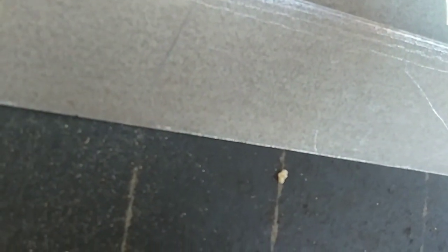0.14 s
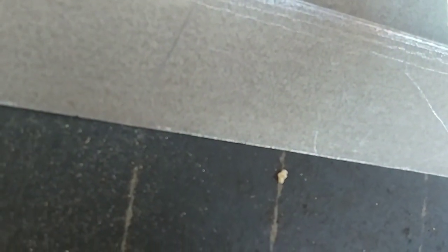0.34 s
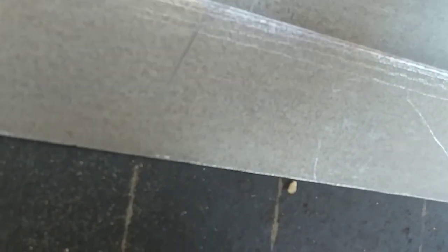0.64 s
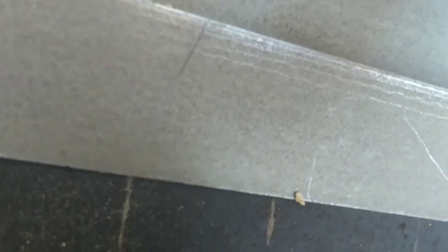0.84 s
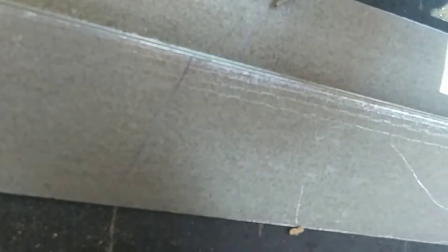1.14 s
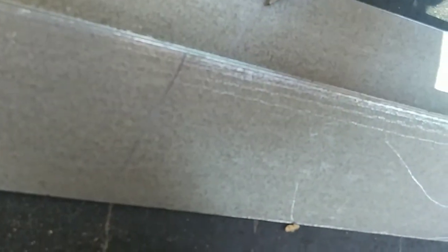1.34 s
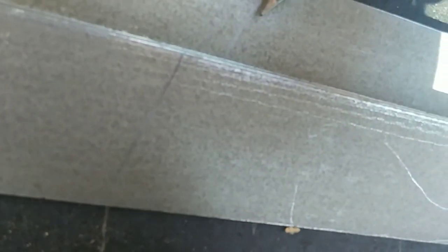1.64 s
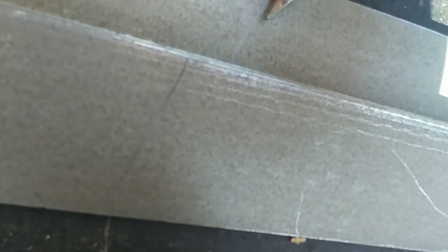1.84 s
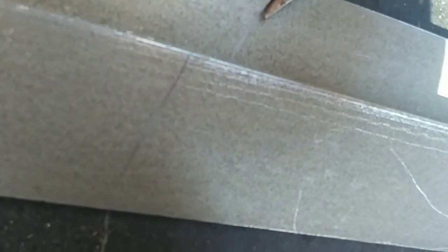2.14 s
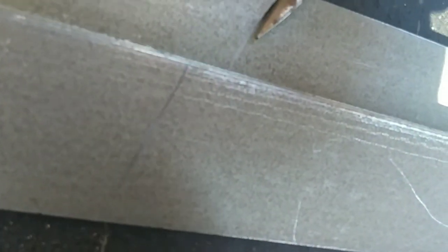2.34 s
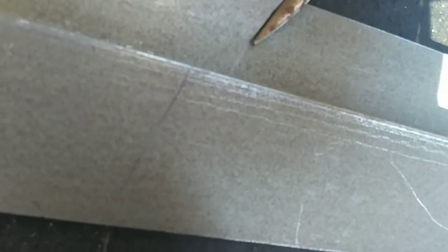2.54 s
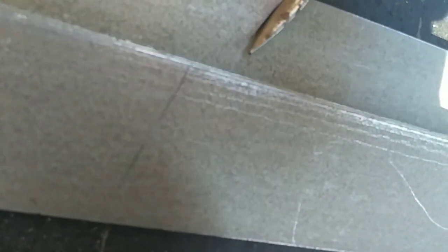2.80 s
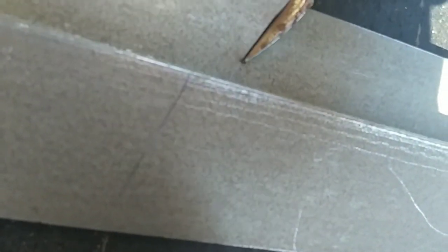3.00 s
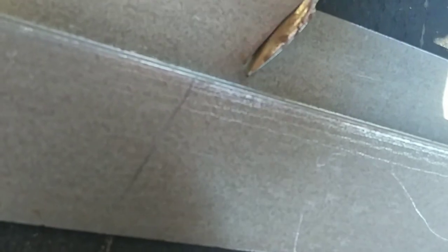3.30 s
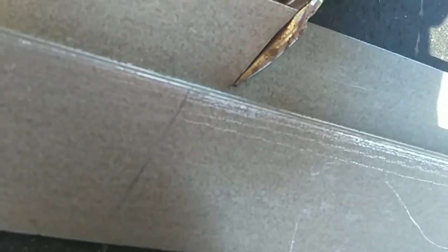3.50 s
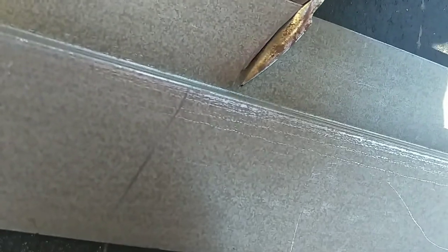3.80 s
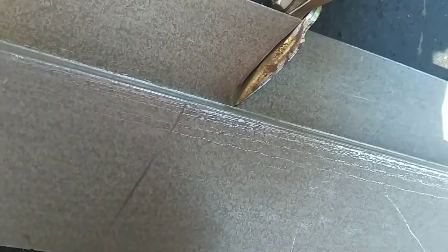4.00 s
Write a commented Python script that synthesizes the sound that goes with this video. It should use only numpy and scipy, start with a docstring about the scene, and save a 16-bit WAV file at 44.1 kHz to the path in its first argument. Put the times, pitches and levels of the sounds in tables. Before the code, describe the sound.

Close, dry metallic scrapes and ticks of metal snips on roof flashing, one low buckling wobble, and two crunching cuts that ring.

```python
"""Hand snips scrape through sheet-metal flashing on a roof, close to the microphone: random slips ring the sheet.
Twice the jaws bite through with a crack and a short crunch of jerky noise that leaves the sheet ringing.
Edges catch with clicks and damped rings, the blade squeaks in thin gliding tones, and once the sheet
buckles with a low wobble that sinks in pitch. Faint outdoor noise, flickering band by band, lies behind."""
import sys
import numpy as np
from scipy import signal
from scipy.fft import rfft, irfft
from scipy.io import wavfile
from scipy.ndimage import uniform_filter1d

SR = 44100
rng = np.random.default_rng(int(sys.argv[2]) if len(sys.argv) > 2 else 0)


def generate_wav(sig):
    """Save sig (samples, or channels by samples) to the path in sys.argv[1] as 16-bit PCM at SR."""
    pcm = np.round(np.clip(np.atleast_2d(sig).T, -1, 1) * 32767).astype(np.int16)
    wavfile.write(sys.argv[1], SR, pcm)


N = 183073
T = np.arange(N) / SR
RING_T = T[:SR]  # one second, enough for any ring or push
RELEASE_DB_PER_S = 150.5  # how fast the sound dies once the hand lets go

# colour of the flashing's crowd of weak modes: pitch_hz [Hz], level_db [dB]
SHEET_COLOUR = [(150, -45), (380, -22.5), (570, -16.5), (950, -2), (1500, -5), (2100, -7.5), (2550, 3),
                (2950, -9.5), (3350, 1.5), (3750, -12), (4350, -11.5), (5600, -17), (6900, -10),
                (7400, -9.5), (7900, -7.5), (8700, -11), (11500, -23)]
# colour of the sheet's low bending: pitch_hz [Hz], level_db [dB]
BEND_COLOUR = [(40, -32), (70, -32), (130, -14), (210, -2.5), (380, 6), (480, 0), (590, -19.5), (820, -6),
               (1150, -30.5), (3000, -41.5)]


def undb(db):
    """Decibels to gain."""
    return 10 ** (np.asarray(db) / 20)


def unit(x):
    """Scale to rms 1."""
    return x / np.sqrt(np.mean(x ** 2))


def unit_energy(x):
    """Scale a response so that it keeps the level of white noise."""
    return x / np.sqrt(np.sum(x ** 2))


def at_hz(points, hz):
    """Read (Hz, value) points on a log-frequency axis."""
    f, value = np.transpose(points)
    return np.interp(np.log(np.maximum(hz, 1)), np.log(f), value)


def colour(x, points):
    """Causal minimum-phase filter with the given (Hz, dB) outline."""
    size = 2048
    outline = undb(at_hz(points, np.fft.rfftfreq(size, 1 / SR)))
    cepstrum = irfft(np.log(outline))
    # folding the cepstrum forward puts the energy as early as possible
    cepstrum[1:size // 2] *= 2
    cepstrum[size // 2 + 1:] = 0
    response = irfft(np.exp(rfft(cepstrum)))
    return signal.fftconvolve(x, response)[:len(x)]


def band(x, lo_hz, hi_hz, order=2):
    """Butterworth band-pass."""
    return signal.sosfilt(signal.butter(order, [lo_hz, hi_hz], "band", fs=SR, output="sos"), x)


def walk(rate_hz):
    """Smooth random drift of rms 1, from random steps taken rate_hz times a second."""
    k = int(SR / rate_hz)
    steps = np.repeat(rng.standard_normal(N // k + 1), k)
    return unit(uniform_filter1d(uniform_filter1d(steps, k), k)[:N])


def add(out, start_s, x):
    """Mix x into out from start_s."""
    i = int(start_s * SR)
    out[i:i + len(x)] += x[:len(out) - i]


def fade(t60_s):
    """Exponential decay by 60 dB in t60_s."""
    return np.exp(-np.log(1000) * RING_T / t60_s)


def slips(rate_hz, spread_db):
    """Stick-slip: tiny impulses at random moments, a few much larger than the rest."""
    size = undb(spread_db * np.minimum(rng.exponential(size=N), np.pi))
    happens = rng.random(N) < rate_hz / SR
    return unit(happens * rng.choice([-1, 1], N) * size)


def sheet_response(modes_db):
    """Ring of the flashing: a dense crowd of weak modes, and strong ones modes_db relative to it."""
    # strongest modes of sheet and blades, before grip damping: pitch_hz [Hz], level_db [dB], t60_s [s]
    strong_modes = [(910, 10, 0.27), (1010, -9, 1.0), (1150, 8, 0.6), (1717, 11.5, 0.34), (2530, -5, 0.41),
                    (2660, 9, 0.28), (2540, 6, 0.15), (2750, -7, 0.42), (2800, 3, .36), (3358, 9, 0.49),
                    (3275, -2, 0.3), (3500, -10, 0.49), (4240, -14, 0.23), (4400, 3.5, .3),
                    (7100, -8, 0.067), (7800, 11.5, 0.28), (8010, 13, 0.13)]
    # decay of the crowd, before grip damping: pitch_hz [Hz], t60_s [s]
    crowd_t60 = [(200, 0.088), (600, 0.47), (1100, 1), (1900, 0.43), (4000, 0.44), (8000, 0.36),
                 (15000, 0.17)]
    crowd, strong = np.zeros(SR), np.zeros(SR)
    edges = np.geomspace(100, 17000, 16)
    for lo, hi in zip(edges, edges[1:]):
        noise = band(rng.standard_normal(SR), lo, hi, order=3)
        crowd += noise * fade(at_hz(crowd_t60, np.sqrt(lo * hi)))
    for hz, db, t60_s in strong_modes:
        strong += undb(db) * fade(t60_s) * np.sin(2 * np.pi * (hz * RING_T + rng.random()))
    return unit_energy(unit_energy(colour(crowd, SHEET_COLOUR)) + undb(modes_db) * unit_energy(strong))


def push(rise_s, hold_s):
    """Pressure of one stroke: it builds, eases while held and is let go."""
    sag_db_per_s = 4.5
    held = np.maximum(RING_T - rise_s, 0)
    sag_db = sag_db_per_s * np.minimum(held, hold_s)
    release_db = RELEASE_DB_PER_S * np.maximum(held - hold_s, 0)
    return np.minimum(RING_T / rise_s, 1) * undb(-(sag_db + release_db))


def scraping(held_t60_s=0.18, direct_db=-3, low_trim_db=-1, hollow_hz=860, count=6):
    """Slips at the blade drive the sheet, which the jaws and hand damp; the same slips bend it at low pitch."""
    # pushes of the blade along the sheet: start_s [s], rise_s [s], hold_s [s], level_db [dB],
    # then relative to level_db: low_db [dB, rumble before low_trim_db], hollow_db [dB, ring], hiss_db [dB, edge]
    strokes = [(0.0, 0.0072, 0.13, -67, 5, -3, -24), (0.13, 0.052, .005, -64, 0, 4, -7),
               (0.487, .005, .003, -49.5, -3, 0, -6.5), (0.505, .05, 0.099, -42.5, -1, -3.5, -5.5),
               (0.753, 0.013, 0.089, -46.5, -2.5, 0, -4.5), (0.85, 0.0084, 0.054, -43, 0.5, -0.5, -6.5),
               (0.885, 0.056, 0.12, -38, -4.5, 0.5, -4), (1.185, 0.013, 0.027, -51.5, -11, -21, -6),
               (1.469, 0.019, 0.049, -49, 3.5, -4, -8), (1.66, 0.005, 0.19, -61, 5.5, -6, 1),
               (1.907, .02, .012, -43, -1.5, -6, -2), (1.98, 0.046, 0.019, -50, -2.5, 1, -11),
               (2.214, 0.022, 0.047, -45, -1, -0.5, -8), (2.3, 0.038, 0.27, -49.5, -11, -10, -2.5),
               (2.361, 0.0046, 0.0082, -46, 0, -5.5, -1.5), (2.716, 0.015, 0.034, -41, 0.5, -6, -9),
               (2.954, .011, .012, -42.5, 1, -2, -7.5), (3.02, 0.0095, 0.0091, -50, 1, -10, -2.5),
               (3.148, 0.0026, 0.033, -46.5, -0.5, -7, -4), (3.22, 0.032, 0.017, -44.5, 3, -4, -9),
               (3.32, 0.035, 0.15, -61, 1, 1, -4), (3.555, 0.014, 0.0069, -40, 1, -2, -6.5),
               (3.73, 0.006, 0.05, -55, -1.5, -2, -7), (3.883, 0.0085, 0.051, -44, -0.5, -1, -6.5),
               (4.11, 0.0044, 0.016, -56, -17, -8, -7)]
    # colour of the rubbing: pitch_hz [Hz], level_db [dB]
    rub_colour = [(400, -5.5), (650, 6.5), (900, 7.5), (1300, 3), (1750, 4), (2550, 1), (3300, -1),
                  (4300, 1), (5500, -1.5), (7800, -2), (9000, -2.5), (12000, -7.5), (15500, -3.5)]
    out, places = np.zeros(N), []
    # each place where the blade touches the sheet has its own slips and ring
    for _ in range(count):
        grains = unit(slips(rate_hz=2000, spread_db=4.0)[:SR])
        response = sheet_response(modes_db=-10) * fade(held_t60_s)
        ring = signal.fftconvolve(grains, response)[:SR]
        direct = undb(direct_db) * unit(colour(grains, SHEET_COLOUR))
        rub = colour(unit(ring) + direct, rub_colour)
        body = signal.sosfilt(signal.butter(4, 5500, fs=SR, output="sos"), rub)
        body = body / np.std(band(body, 1700, 5000))  # the stroke level is that of the middle band
        bend = unit(colour(grains, BEND_COLOUR))
        hollow = unit(band(grains, hollow_hz / 1.14, hollow_hz * 1.133))
        hiss = unit(band(rub, 5240, 21050, order=4))
        places.append(np.array([body, bend, hollow, hiss]))
    for k, (start_s, rise_s, hold_s, level_db, low_db, hollow_db, hiss_db) in enumerate(strokes):
        layers = np.roll(places[k % count], rng.integers(SR), axis=1)  # start anywhere in the texture
        gains = undb(level_db + np.array([0, low_db + low_trim_db, hollow_db, hiss_db]))
        add(out, start_s, gains @ layers * push(rise_s, hold_s))
    return out


def crack(hz, length_s, grit):
    """A sudden release: a few heavily damped cycles with some grit, peak 1."""
    t = RING_T[:SR // 40]
    force = t / length_s * np.exp(-2 * t / length_s)
    noise = unit(band(rng.standard_normal(len(t)), hz / 2.36, hz * 1.69, order=3))
    pulse = force * (np.sin(2 * np.pi * hz * t) + grit * noise)
    return pulse / np.abs(pulse).max()


def struck(response):
    """Scale a ring to rms 1 over its first 10 ms."""
    return response / np.std(response[:SR // 100])


def bites(thump_t60_s=0.52, direct_db=-3, uneven_db=3, blade_hz=4350, blade_db=-8, blade_t60_s=0.17):
    """The metal cracks, the sheet thumps and rings, and the blades crunch on through the cut."""
    # jaws biting through: start_s [s], crack_db [dB peak], crack_hz [Hz], crack_s [s], ring_db [dB],
    # grip_t60_s [s, added damping], thump_db [dB], crunch_db [dB], delay_s [s], spread_s [s]
    bite_rows = [(2.4831, -5.5, 2490, 0.00074, -23, 9.8, -47, -24, 0.022, 0.023),
                 (3.4692, -11, 1137, 0.0024, -24.5, 0.73, -34.5, -34, 0.045, 0.026)]
    out = np.zeros(N)
    for (start_s, crack_db, crack_hz, crack_s, ring_db,
         grip_t60_s, thump_db, crunch_db, delay_s, spread_s) in bite_rows:
        ring = sheet_response(modes_db=-9) * fade(grip_t60_s)
        thump = unit(colour(rng.standard_normal(SR), BEND_COLOUR)) * fade(thump_t60_s)
        add(out, start_s, undb(crack_db) * crack(crack_hz, crack_s, grit=0.33))
        add(out, start_s, undb(ring_db) * struck(ring))
        add(out, start_s, undb(thump_db) * thump)
        # the shearing swells just after the crack, advances in jerks and dies as the jaws close
        swell = np.exp(-.5 * ((T - start_s - delay_s) / spread_s) ** 2) * (T > start_s)
        shear = undb(crunch_db) * swell
        grains = band(slips(rate_hz=4000, spread_db=5.5), 1800, 12400, order=1)
        grains = unit(grains * undb(uneven_db * walk(300)))
        blade_ring = unit_energy(band(ring * fade(blade_t60_s), blade_hz / 1.05, blade_hz * 1.05))
        response = unit_energy(unit_energy(ring) + undb(blade_db) * blade_ring)
        out += signal.fftconvolve(shear * grains, response)[:N]
        out += undb(direct_db) * shear * unit(colour(grains, SHEET_COLOUR))
    return out


def faint_ticks(count=14, mean_db=-43, spread_db=1, centre_hz=4200, octaves=.8, ring_db=-22):
    """Small catches at random moments: start_s, level_db before the trim in ticks(), pitch_hz, ring_db."""
    rows = []
    for _ in range(count):
        start_s = rng.uniform(0, T[-1])
        level_db = mean_db + spread_db * rng.standard_normal()
        pitch_hz = centre_hz * 2 ** (octaves * rng.uniform(-0.96, 1))
        rows.append((start_s, level_db, pitch_hz, ring_db))
    return rows


def ticks(sheet, held_t60_s=0.38, length_s=0.0012, trim_db=-1):
    """Each catch of an edge clicks and rings the damped sheet around its own pitch."""
    # catches at set moments, loud and soft:
    # start_s [s], level_db [dB peak before trim_db], pitch_hz [Hz], ring_db [dB re level_db]
    set_ticks = [(.184, -36.5, 760, -18), (.382, -45, 1400, -11), (0.461, -47.5, 2720, -10),
                 (.551, -29, 835, -16), (1.0202, -25.5, 3340, -10), (1.036, -22, 3200, -15),
                 (1.4122, -46, 5740, -27), (1.4711, -37, 1710, -23), (1.7364, -43.5, 6040, -12),
                 (1.8497, -38.5, 5600, -11), (1.8716, -39.5, 4900, -6), (2.0415, -30, 5310, -17),
                 (2.3663, -23.5, 824, -18), (2.3674, -28, 2860, -7.5), (2.7178, -29, 1800, -18),
                 (2.878, -37.5, 5760, -14.5), (2.9629, -33, 1750, -13), (3.0343, -35.5, 7100, -7.5),
                 (3.1495, -36.5, 3380, -16), (3.169, -30.5, 1130, -13), (3.4105, -35, 1200, -20),
                 (3.461, -29, 1770, 1), (3.4962, -17.5, 4200, -13), (3.5625, -27.5, 615, -24),
                 (3.8341, -34, 3060, -10.5), (3.8855, -34, 3000, -14), (3.911, -26.5, 2270, -27),
                 (3.9115, -23.5, 400, -11.5), (4.113, -35, 2660, -17)]
    out = np.zeros(N)
    damped = sheet * fade(held_t60_s)
    for start_s, level_db, pitch_hz, ring_db in list(set_ticks) + faint_ticks():
        click = crack(pitch_hz, length_s + 1 / pitch_hz, grit=1)  # low catches last longer
        ring = struck(band(damped, pitch_hz / 2, pitch_hz * 2, order=1))
        add(out, start_s, undb(level_db + trim_db) * click)
        add(out, start_s, undb(level_db + ring_db + trim_db) * ring)
    return out


def squeaks(jitter_depth=.05, flutter_db=3):
    """Fast regular stick-slip along the cut: a thin, unsteady tone that glides in pitch."""
    # squeaks: start_s [s], length_s [s], start_hz [Hz], end_hz [Hz], level_db [dB, rms at mid-squeak before flutter]
    squeak_rows = [(1.654, 0.1, 6900, 8800, -60), (2.146, 0.04, 3120, 2880, -63),
                   (2.876, 0.092, 2920, 2820, -59.5), (3.428, 0.039, 2880, 3040, -55)]
    out = np.zeros(N)
    jitter = 1 + jitter_depth * walk(1200)
    flutter = unit(undb(flutter_db * walk(360)))
    for start_s, length_s, start_hz, end_hz, level_db in squeak_rows:
        progress = np.clip((T - start_s) / length_s, 0, 1)
        hz = (start_hz + (end_hz - start_hz) * progress) * jitter
        tone = np.sqrt(2) * np.sin(2 * np.pi * np.cumsum(hz) / SR)
        out += undb(level_db) * np.sin(np.pi * progress) * tone
    return out * flutter


def buckling(flap_hz=48, depth=0.8, unsteady=.09, loosen_s=.04, length_s=.12, judder_db=-7):
    """A bending mode sinks in pitch as the sheet gives way, then flutters and judders as the sheet flaps."""
    start_s, rise_s, level_db, decay_db_per_s = 1.835, 0.0048, -34.5, 102
    start_hz, end_hz, sink_s = 415, 325, .024
    t = np.maximum(T - start_s, 0)
    given = np.maximum(t - rise_s, 0)
    pitch = end_hz + (start_hz - end_hz) * np.exp(-t / sink_s)
    pitch = pitch * (1 + unsteady * walk(200))
    flap = np.sin(2 * np.pi * np.cumsum(flap_hz * (1 + 0.32 * walk(60))) / SR)
    loose = np.minimum(given / loosen_s, 1)  # the flapping builds up once the sheet has given way
    tone = np.sqrt(2) * (1 + depth * loose * flap) * np.sin(2 * np.pi * np.cumsum(pitch) / SR)
    judder = undb(judder_db) * loose * unit(colour(rng.standard_normal(N), BEND_COLOUR))
    db = level_db - decay_db_per_s * given - RELEASE_DB_PER_S * np.maximum(t - length_s, 0)
    return np.minimum(t / rise_s, 1) * undb(db) * (tone + judder)


def outdoors(level_db=-53, flicker_db=2.5):
    """Faint outdoor noise: coloured noise whose level flickers separately in each band."""
    # colour of the outdoor air: pitch_hz [Hz], level_db [dB]
    air_colour = [(25, -71), (55, -18), (110, -1), (200, 5.5), (350, 1), (600, 0.5), (950, 0.5),
                  (1500, -3.5), (2100, -17.5), (4000, -20.5), (8000, -24), (12000, -35), (16000, -53)]
    noise = unit(colour(rng.standard_normal(N), air_colour))
    spectrum, hz = rfft(noise), np.fft.rfftfreq(N, 1 / SR)
    edges = [0, 250, 600, 1200, 2500, 6000, SR]
    out = np.zeros(N)
    for lo, hi in zip(edges, edges[1:]):
        part = irfft(spectrum * ((hz >= lo) & (hz < hi)), N)
        out += part * undb(level_db + flicker_db * walk(23.95))
    return out


def scene():
    """The snips at work on the flashing, with the outdoors behind."""
    catches = ticks(sheet_response(modes_db=-17.5))
    return (scraping() + bites() + catches + squeaks() + buckling() + outdoors())[None]


def record(dry):
    """The microphone thins the lowest bass and softens the treble; the recorder cuts the top."""
    # microphone response: pitch_hz [Hz], level_db [dB]
    mic_response = [(25, -25), (65, -1.5), (8500, -2), (10500, -2.5), (12500, -8.5), (15500, -13.5)]
    top_cut = signal.ellip(8, .2, 70, 15600, fs=SR, output="sos")  # steep low-pass at 15.6 kHz
    return signal.sosfilt(top_cut, colour(dry[0], mic_response))[None]


dry = scene()
out = record(dry)
generate_wav(out)
```